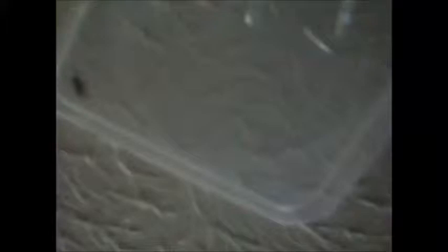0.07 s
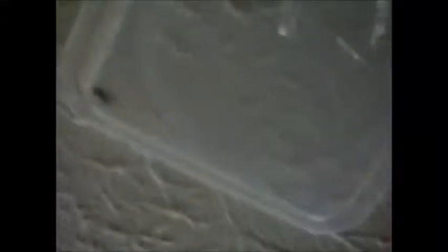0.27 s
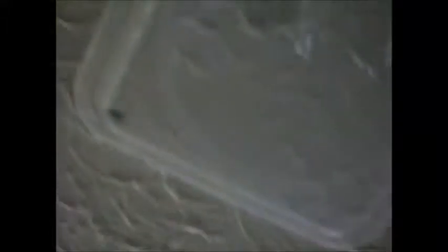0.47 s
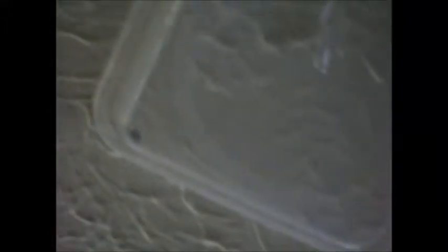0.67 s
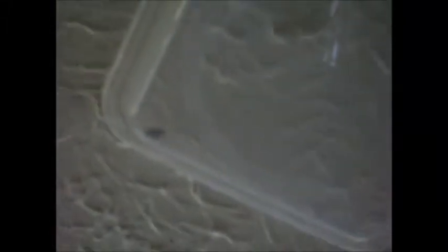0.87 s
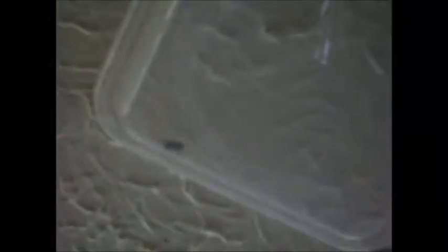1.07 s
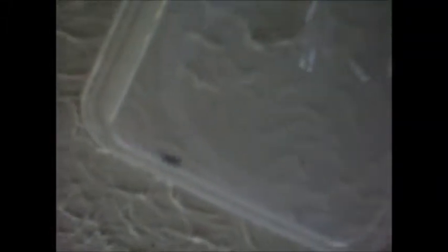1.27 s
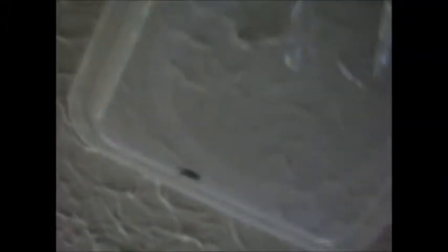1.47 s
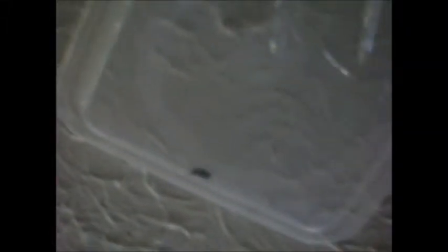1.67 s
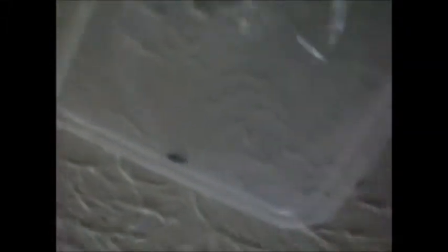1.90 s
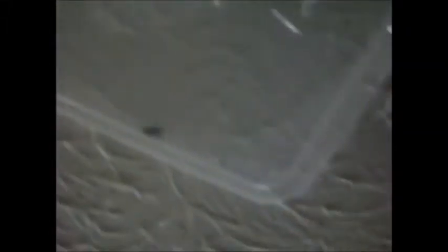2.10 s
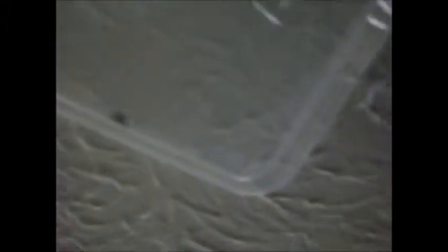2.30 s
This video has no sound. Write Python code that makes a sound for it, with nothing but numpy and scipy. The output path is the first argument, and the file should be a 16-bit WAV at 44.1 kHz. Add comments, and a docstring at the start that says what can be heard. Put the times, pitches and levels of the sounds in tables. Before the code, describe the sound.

A microphone pops on, then hisses steadily with a few small handling noises.

```python
"""Over a plastic tub, a small hand-held camera starts up.
Its microphone input opens abruptly onto a bias offset: a pop, a brief gritty flutter, then the
bias drains away. Steady amplifier hiss, room rumble, a low hum and a faint whine remain,
with a few small bumps, rubs and ticks from the hand on the plastic casing."""
import sys
import numpy as np
from scipy import signal
from scipy.fft import rfft, irfft
from scipy.io import wavfile

SR = 44100
rng = np.random.default_rng(int(sys.argv[2]) if len(sys.argv) > 2 else 0)


def persist_wave(psi):
    """Save psi, clipped to +-1, as 16-bit WAV."""
    counts = np.round(np.clip(psi, -1, 1) * 32767).astype(np.int16)
    wavfile.write(sys.argv[1], SR, np.atleast_2d(counts).T)


N = 108045
TIME = np.arange(N) / SR
SWITCH_ON_S = .10592


def from_db(db):
    """Decibels to gain."""
    return 10 ** (np.asarray(db) / 20)


def resonate(x, hz, width_hz):
    """Two-pole band-pass applied twice; unit rms out."""
    radius = np.exp(-np.pi * width_hz / SR)
    section = [1, 0, -1, 1, -2 * radius * np.cos(2 * np.pi * hz / SR), radius ** 2]
    band = signal.sosfilt([section, section], x)
    return band / np.sqrt(np.mean(band ** 2) + 1e-20)


def decay(start_s, decay_s):
    """Step to 1, then exponential decay."""
    return (TIME >= start_s) * np.exp(-np.maximum(TIME - start_s, 0) / decay_s)


def damped_sine(start_s, level_db, pitch_hz, decay_s):
    """One mode ringing down."""
    return from_db(level_db) * decay(start_s, decay_s) * np.sin(2 * np.pi * pitch_hz * (TIME - start_s))


def wander(points):
    """Linear drift through evenly spaced unit Gaussian points."""
    return np.interp(np.arange(N), np.linspace(0, N, points), rng.standard_normal(points))


# Noise floor spectrum: freq_hz, density_db_per_hz
NOISE_FLOOR = [(10, -52), (22, -58), (40, -67), (80, -68.5), (120, -74), (220, -76.5), (400, -78.5),
               (800, -81.5), (1300, -83.5), (3000, -85.5), (4300, -85.5), (5200, -92)]

def hiss_and_rumble(wake_from_db=-19, wake_s=.18):
    """Amplifier hiss over room rumble, rising as the input wakes."""
    freq_hz, density_db = np.transpose(NOISE_FLOOR)
    bins_hz = np.maximum(np.arange(N // 2 + 1) * SR / N, 1)
    colour = from_db(np.interp(np.log(bins_hz), np.log(freq_hz), density_db)) * np.sqrt(SR / 2)
    noise = irfft(rfft(rng.standard_normal(N)) * colour, N)
    awake = np.clip((TIME - SWITCH_ON_S) / wake_s, 0, 1)
    return from_db(wake_from_db * (1 - awake ** 2)) * noise


# Steady tones: pitch_hz, rms_db, waver_hz
STEADY_TONES = [(163.2, -60, 4), (4283, -67.5, 1.5)]

def hum_and_whine():
    """Faint low hum and thin electronic whine, both wavering in pitch."""
    out = np.zeros(N)
    for pitch_hz, rms_db, waver_hz in STEADY_TONES:
        phase = 2 * np.pi * np.cumsum(pitch_hz + waver_hz * wander(points=40)) / SR
        out += from_db(rms_db) * np.sqrt(2) * np.sin(phase)
    return out


# Handling bumps: start_s, level_db, pitch_hz, decay_s
BODY_BUMPS = [(0.128, -25.5, 70.2, 0.011), (.135, -26, 249, 0.011), (.1475, -29, 480, .003),
              (0.403, -40, 130, 0.011), (.737, -40, 172, .012), (1.317, -38.5, 110, 0.015),
              (1.735, -39, 55, .025), (1.981, -38.5, 270, 0.0066), (2.06, -38.5, 69.3, 0.021)]

def body_bumps():
    """Dull, quickly damped swings of the camera body."""
    return -sum(damped_sine(*bump) for bump in BODY_BUMPS)


# Finger rubs: centre_s, half_length_s, level_db, centre_hz
FINGER_RUBS = [(.98, .04, -47.5, 2800), (1.995, .028, -48, 3500)]

def finger_rubs(width_hz=2800, grain_db=3):
    """Grainy friction on the casing, swelling and fading."""
    out = np.zeros(N)
    for centre_s, half_length_s, level_db, centre_hz in FINGER_RUBS:
        grains = rng.standard_normal(N) * from_db(grain_db * wander(points=900))
        swell = np.exp(-((TIME - centre_s) / half_length_s) ** 2)
        out += from_db(level_db) * swell * resonate(grains, centre_hz, width_hz)
    return out


# Plastic ticks: start_s, level_db, pitch_hz, decay_s
CASING_TICKS = [(.9505, -36, 2500, 0.0062), (1.0185, -38, 1800, .004), (1.038, -42, 2450, .003),
                (1.0699, -39.5, 1500, 0.0024), (1.666, -37.5, 1100, 0.0022), (2.018, -28, 3000, 0.0021),
                (2.024, -35, 2850, .0025), (2.116, -39, 4000, 0.0018)]

def casing_ticks(width_hz=1000, body_hz=1350, body_db=-5.5, rise_s=.00048):
    """Short scrapes, each ringing the casing at its own pitch and at a shared body resonance."""
    out = np.zeros(N)
    for start_s, level_db, pitch_hz, decay_s in CASING_TICKS:
        scrape = rng.standard_normal(N)
        ring = resonate(scrape, pitch_hz, width_hz)
        body = from_db(body_db) * resonate(scrape, body_hz, width_hz)
        envelope = decay(start_s, decay_s) * (1 - decay(start_s, rise_s))
        out += from_db(level_db) * envelope * (ring + body)
    return out


def input_bias(offset=.45, flutter_depth=.056, period_s=.01215, release_s=.298, drain_s=.115):
    """The offset sags and resets in an uneven sawtooth, then drains with one downward snap."""
    cycles = np.arange(-1, 30)
    jitter = .08 * rng.standard_normal(len(cycles))
    resets_s = .1118 + period_s * (cycles + jitter)
    sawtooth = .5 - np.interp(TIME, resets_s, cycles) % 1
    held = offset + flutter_depth * sawtooth
    draining = offset * decay(release_s, drain_s)
    snap = from_db(-18) * decay(start_s=.3232, decay_s=.0026)
    return np.where(TIME < release_s, held, draining) - snap


def grit(x, threshold=.25, step=.0156, hold_samples=4):
    """Above the threshold the signal moves in coarse held steps; full scale is 1."""
    stepped = np.round(x[:, ::hold_samples] / step) * step
    stairs = np.repeat(stepped, hold_samples, axis=1)[:, :N]
    return np.where(x > threshold, stairs, x)


def switch_on_pop(x):
    """The input opens abruptly onto the offset and its filter rings."""
    ring = damped_sine(SWITCH_ON_S, level_db=-25, pitch_hz=4900, decay_s=.0003)
    return x * (TIME >= SWITCH_ON_S) + ring


def scene():
    """Noise floor, tones and handling; mono."""
    return (hiss_and_rumble() + hum_and_whine() + casing_ticks() + finger_rubs() + body_bumps())[None]


def record(dry):
    """Input chain: bias, grit, narrow low-pass, switch-on, wide low-pass."""
    input_top_hz, output_top_hz = 5250, 16300
    input_lowpass = signal.ellip(8, .3, 70, input_top_hz, fs=SR, output="sos")
    output_lowpass = signal.ellip(10, .1, 80, output_top_hz, fs=SR, output="sos")
    narrow = signal.sosfilt(input_lowpass, grit(dry + input_bias()))
    return signal.sosfilt(output_lowpass, switch_on_pop(narrow))


dry = scene()
out = record(dry)
persist_wave(out)
```